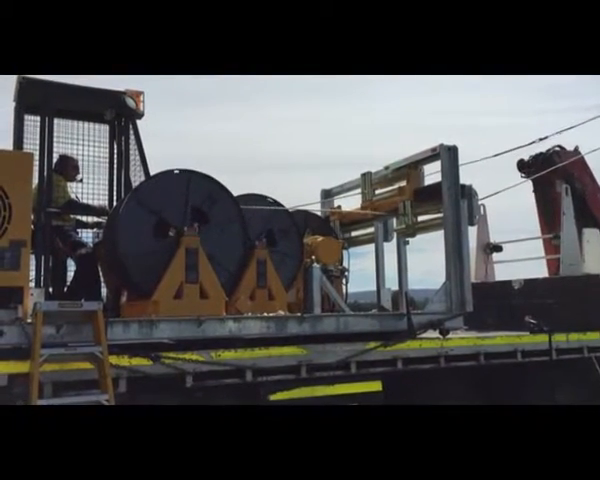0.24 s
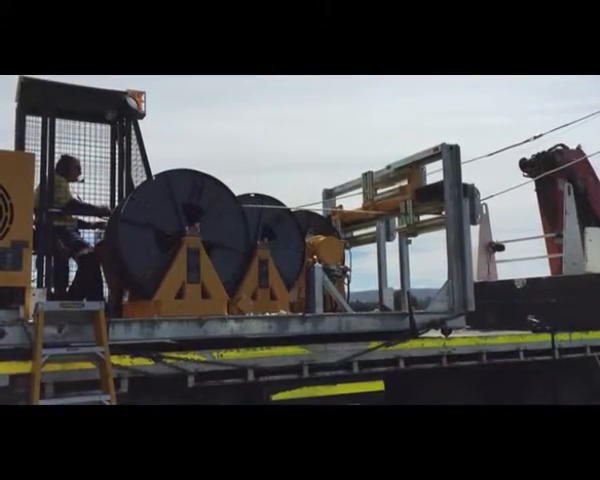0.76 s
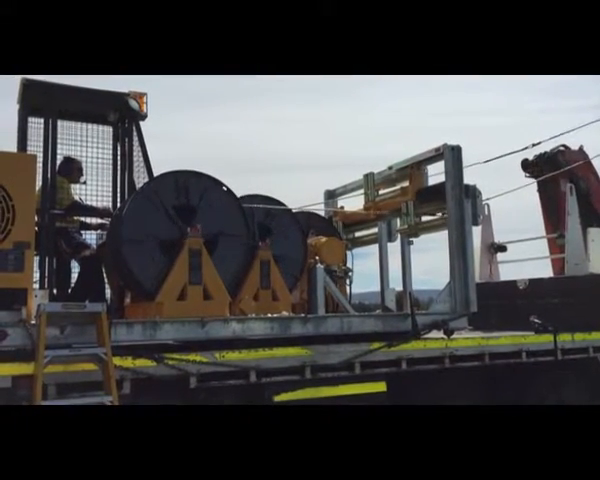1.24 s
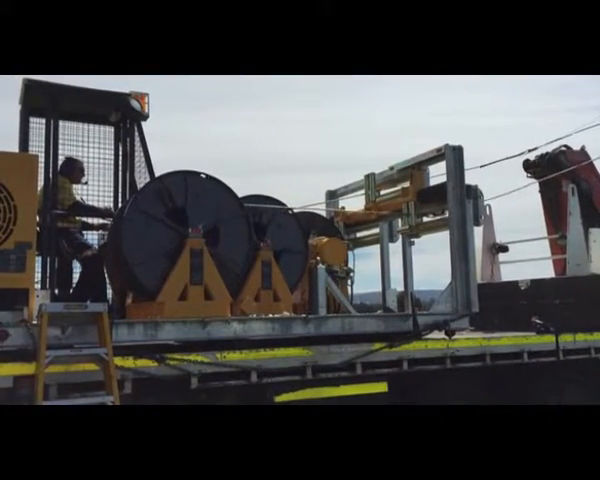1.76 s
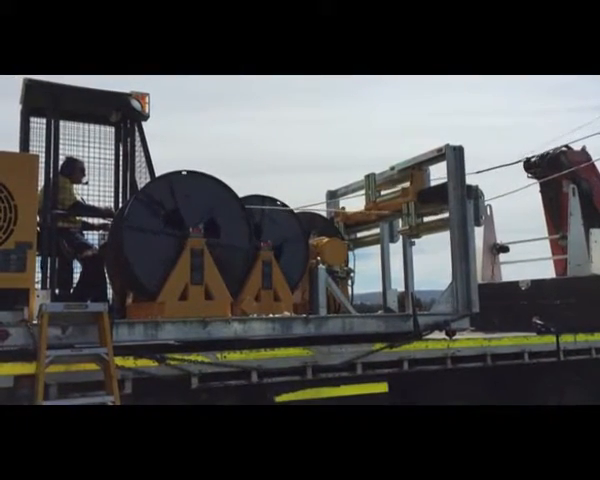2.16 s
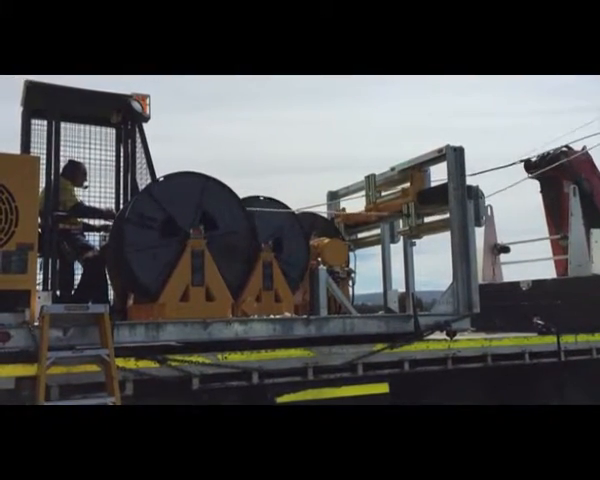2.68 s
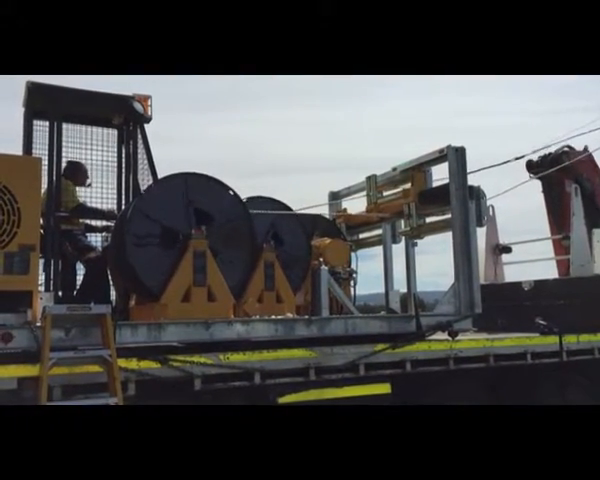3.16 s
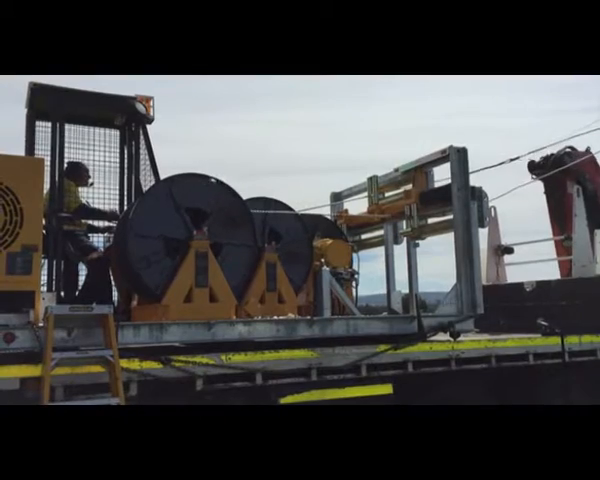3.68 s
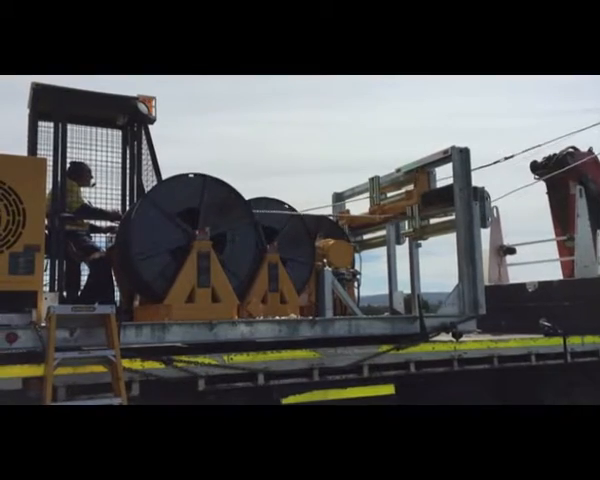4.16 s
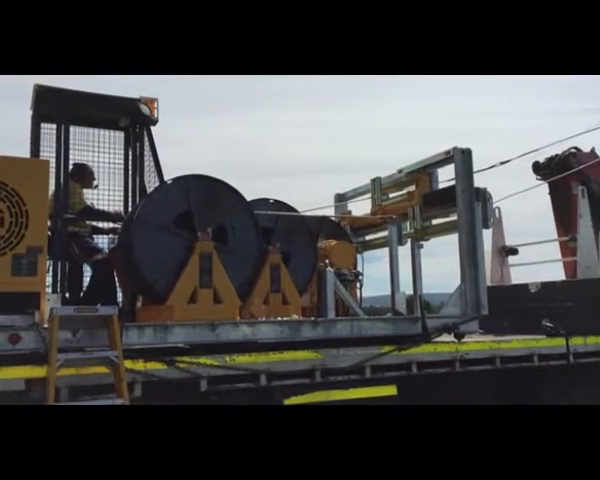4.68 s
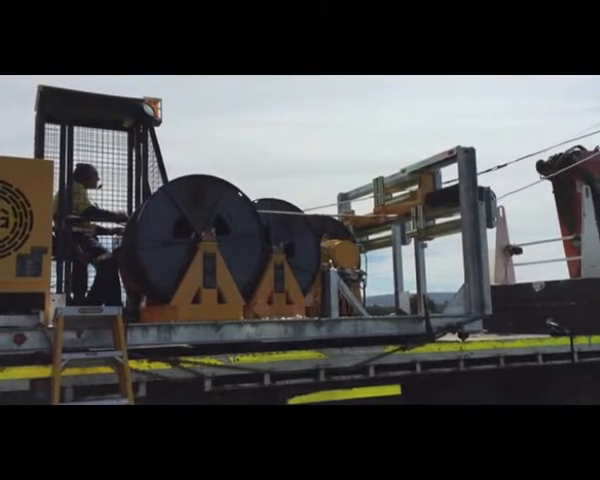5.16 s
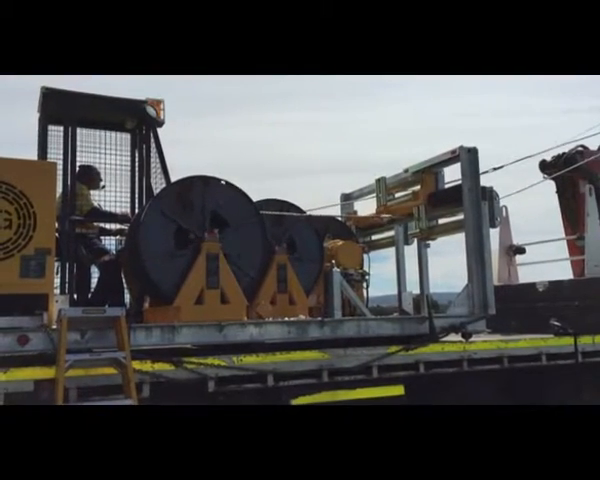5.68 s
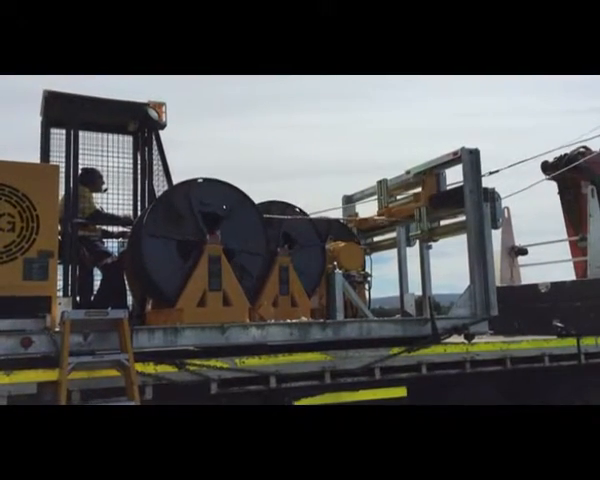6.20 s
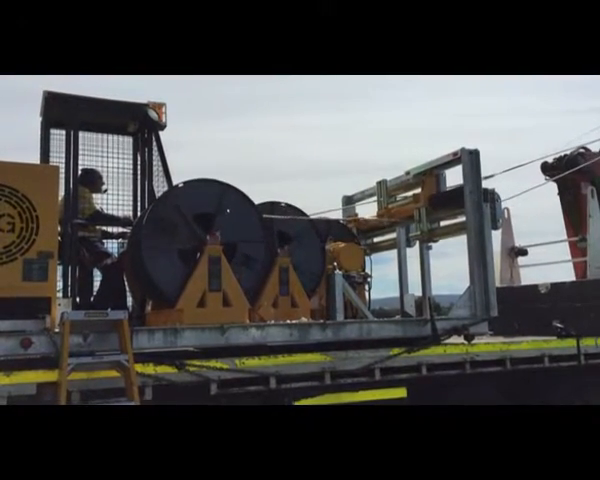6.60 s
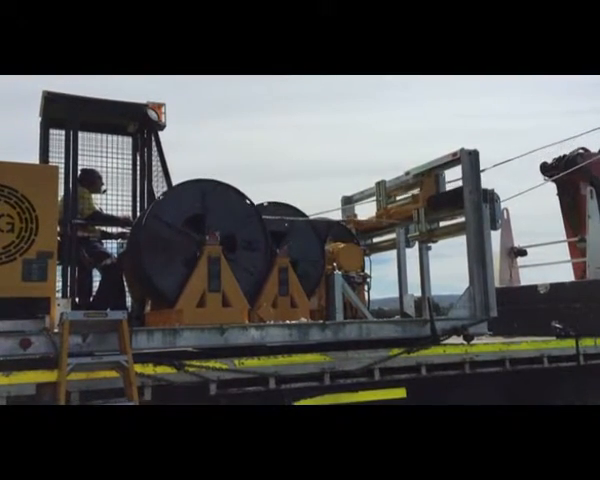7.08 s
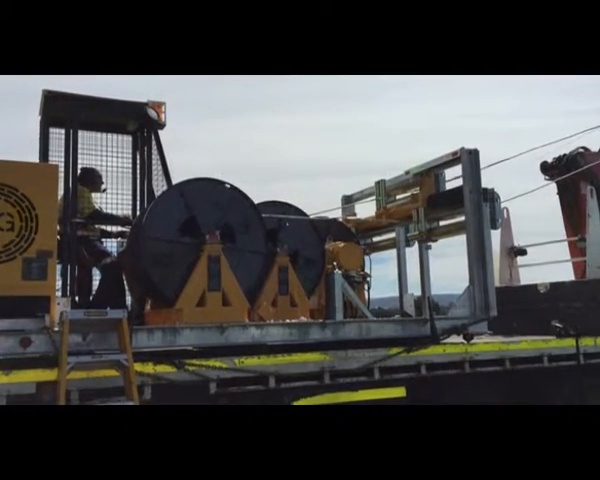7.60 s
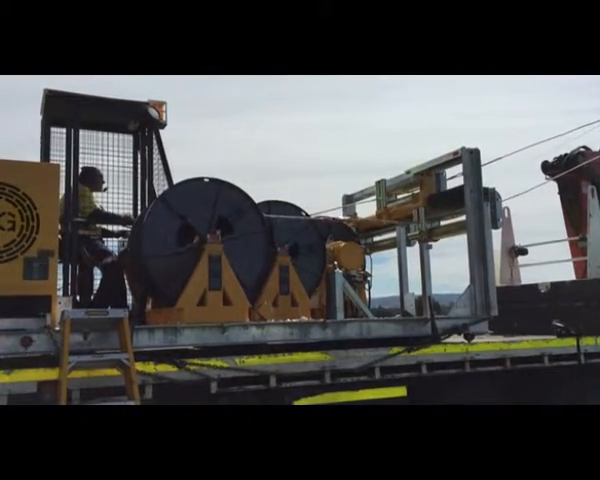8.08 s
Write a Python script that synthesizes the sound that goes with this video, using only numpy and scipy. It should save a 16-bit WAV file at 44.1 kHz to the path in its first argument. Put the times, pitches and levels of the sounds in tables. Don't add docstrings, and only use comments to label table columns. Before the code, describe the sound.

A diesel engine drones steadily at constant speed with a hydraulic pump whine and clattering knocks, while wind thumps the microphone at start and near the end.

```python
import sys
import numpy as np
from scipy import signal
from scipy.fft import rfft, irfft
from scipy.io import wavfile
from scipy.ndimage import uniform_filter1d

SR = 44100
rng = np.random.default_rng(int(sys.argv[2]) if len(sys.argv) > 2 else 0)


def volts_from_decibels(level):
    exponent = np.asarray(level, float) / 20
    return 10 ** exponent


def output_pcm(signal):
    pcm = np.clip(np.atleast_2d(signal).T, -1, 1) * 32767
    wavfile.write(sys.argv[1], SR, np.round(pcm).astype(np.int16))


N = 367794


def rms_one(x):
    return x / np.sqrt(np.mean(x ** 2) + 1e-20)


def in_time(rows):
    s, *columns = np.transpose(rows)
    return [np.interp(np.arange(N) / SR, s, c) for c in columns]


def at_hz(points, hz, axis=1):
    points = np.array(points)
    return np.interp(np.log(hz), np.log(points[:, 0]), points[:, axis])


def drift(rate):
    r = np.exp(-40 * np.pi * rate / SR)
    noise = rng.standard_normal(N // 20 + 4002)
    slow = signal.lfilter([1], [1, -2 * r, r * r], noise)[4000:]
    return np.interp(np.arange(N) / 20, np.arange(len(slow)), rms_one(slow))


def coloured(spectrum):
    hz = np.arange(1, N // 2 + 2) * SR / N
    white = rfft(rng.standard_normal(N))
    return rms_one(irfft(white * volts_from_decibels(at_hz(spectrum, hz)), N))


def resonate(x, hz, width):
    r = np.exp(-np.pi * width / SR)
    poles = [1, -2 * r * np.cos(2 * np.pi * hz / SR), r * r]
    return signal.lfilter([(1 - r * r) / 2, 0, (r * r - 1) / 2], poles, x)


# t/s, speed/rpm
CRANK_SPEED = [
    (0, 1771.2),
    (1.5, 1774.8),
    (3.3, 1773.4),
    (4.3, 1771.8),
    (5.4, 1774.3),
    (6.4, 1771.3),
    (8.34, 1773.9),
]


def crank_cycle():
    start_cycle = .029
    return start_cycle + np.cumsum(in_time(CRANK_SPEED)[0]) / 120 / SR


# order (multiple of the cycle; 4 = firing, 18 = pump pistons), rms level/dB
ORDERS = [(4, -31), (8, -49), (11, -57), (12, -51), (13, -51), (16, -49), (17, -47), (18, -36), (24, -54),
          (35, -52), (36, -37), (38, -52), (42, -53), (54, -51), (71, -45), (79, -46), (81, -47), (89, -49),
          (99, -41), (102, -43), (103, -42), (107, -47), (116, -49), (121, -46), (123, -44), (144, -51),
          (188, -52), (192, -55), (195, -58)]
# t/s, level over mean/dB
OIL_PRESSURE = [
    (0, .5),
    (1.3, 1),
    (2.8, -1),
    (4.2, 1.2),
    (5.3, -0.5),
    (6.5, 2),
    (7.6, 2.5),
    (8.34, 0.7),
]
ORDER_ANSWER = {4: (1, .05, 1, .01), 18: (.5, 1.01, .6, .01), 36: (2, 0.1, 0.3, -0.27)}


def exhaust_and_pump(cycle, waver, wander, spread):
    crest = .825
    pressure_db = in_time(OIL_PRESSURE)[0]
    swell = {}
    for order, (offset_db, share, swell_db, fade_db) in ORDER_ANSWER.items():
        fade = fade_db * np.arange(N) / SR
        swell[order] = volts_from_decibels(offset_db + share * pressure_db + swell_db * drift(1.6) + fade)
    turn = ((cycle - crest + wander * drift(3.9)) % 1).astype(np.float32)
    wavers = [drift(12.6) for k in range(5)]
    out = 0
    for k, (order, level_db) in enumerate(ORDERS):
        wavering = 1 + waver * (1 + order / 26.0) * wavers[k % 5]
        size = swell.get(order, 1) * volts_from_decibels(level_db) * wavering
        offset = np.float32(spread * rng.standard_normal() * (order > 12) / order)
        out = out + size * np.cos(np.float32(2 * np.pi * order) * (turn + offset))
    return np.sqrt(2) * out


FIRING_PLACES = [
    .055,
    .33,
    .565,
    .775,
]
# f/Hz, level/dB of cylinders 1, 2, 3, 4
CYLINDER_REACH = [(700, -2, 0, -2, -4), (1050, -2, 0, -4, -4), (1250, 0, -2, -2, 0), (1490, -2, -8, -5, 0),
                  (1800, -7, -1, -4, 0), (2100, -2, -1, -2, 0), (2770, 0, -4, 0, -5)]
# f/Hz, bandwidth/Hz, level/dB
BLOCK_MODES = [(638.5, 13.5, -10.5), (803, 30.4, -15.5), (959, 28, -12), (1055, 51.4, -9),
               (1196.3, 17, -3.5), (1292, 38, -6.5), (1494, 45.7, -.5), (1572, 28, -12.5), (1763, 40, -6),
               (1822, 64, -6), (2025, 18, -6.5), (2126, 48, -13), (2254, 43, -20.5), (2497, 27, -40),
               (2490, 45, -28), (2796, 65, -14), (2670, 55, -13.5)]


def block(cycle, rattle_db, jitter, scatter_db):
    knock_lead = .04
    whole = np.arange(-1, int(cycle[-1]))
    late = jitter * rng.standard_normal((len(whole), 4, 2))
    loud = scatter_db * rng.standard_normal((len(whole), 4, 2))
    firing = whole[:, None, None] + np.array(FIRING_PLACES)[:, None] - knock_lead
    knocks = firing + [0, .05]
    out = 0
    for k, (hz, width, level_db) in enumerate(BLOCK_MODES):
        path = rng.random((4, 2)) / hz
        reach_db = np.array([at_hz(CYLINDER_REACH, hz, axis=c) for c in range(1, 5)])
        reach_db = reach_db[:, None] + [0, -7.0]
        at = np.interp(knocks, cycle, np.arange(N), left=-99)
        at = (at + (late / hz + path) * SR).astype(int)
        size = volts_from_decibels(reach_db + loud + 1.5 * rng.standard_normal(at.shape))
        clicks = np.zeros(N)
        clicks[at[at >= 0]] = size[at >= 0]
        rattle = volts_from_decibels(rattle_db + 3 * (hz > 1900)) * rng.standard_normal(N)
        ringing = resonate(resonate(rms_one(clicks) + rattle, hz, 1.5 * width), hz, 2.5 * width)
        out = out + (-1) ** k * volts_from_decibels(level_db) * ringing
    return out


# f/Hz, density level/dB
RUSH_SPECTRUM = [(24, -13.5), (40, -8.5), (76, -10), (135, -12.5), (266, -10.5), (404, -20), (530, -7),
                 (867, -20.5), (1500, -8), (2400, -22.5), (2780, -5.5), (3100, -35), (4030, -74),
                 (6820, -120)]


def rush():
    return volts_from_decibels(-34.5 + 2.5 * drift(14.0)) * coloured(RUSH_SPECTRUM)


def engine_and_pump(cycle):
    sound = exhaust_and_pump(cycle, waver=.11, wander=.0006, spread=.12)
    sound += volts_from_decibels(-7.5) * block(cycle, rattle_db=-5.5, jitter=.11, scatter_db=2.3)
    sound += rush()
    edge_hz = 2940
    return signal.sosfilt(signal.ellip(8, 1, 50, edge_hz, fs=SR, output="sos"), sound)


def throb(cycle, sharp):
    return sum(np.exp(sharp * (np.cos(2 * np.pi * (cycle - at - .04)) - 1)) for at in FIRING_PLACES)


# f/Hz, bandwidth/Hz, level/dB
TREBLE_BANDS = [(3180, 40, -22), (3370, 40, -16), (3470, 40, -4.5), (3700, 40, -26), (3900, 30, -25),
                (3990, 33, -19), (4207, 33, -11.5), (4490, 30, -14.5), (4690, 40, -26), (4867, 40, -7),
                (5310, 40, -11), (5845, 110, -2.5), (6550, 40, -3), (7170, 50, -6), (7905, 47, -6),
                (8420, 100, -11.5), (8860, 80, -12), (9355, 70, -15), (9900, 85, -18)]
# f/Hz, density level/dB
FAN_SPECTRUM = [(2900, -70.5), (3100, -15.5), (4600, -27.5), (5080, -18), (5400, 1), (5800, 1),
                (6200, -4.5), (7600, -1.5), (8200, -12.5), (8600, -30.5), (8800, -15.5), (9500, -15),
                (9650, -30), (9850, -20)]


def fan(cycle, air_db, ring_db, throb_db, flicker_db):
    breaths = [volts_from_decibels(1.17 * drift(5.0)) for k in range(4)]
    rings = 0
    for k, (hz, width, level_db) in enumerate(TREBLE_BANDS):
        narrow = resonate(resonate(rng.standard_normal(N), hz, 1.2 * width), hz, 1.8 * width)
        rings = rings + volts_from_decibels(level_db) * breaths[k % 4] * narrow
    flicker = drift(8) + drift(35)
    shake = volts_from_decibels(throb_db * throb(cycle, sharp=16.0) + flicker_db * flicker)
    return shake * (volts_from_decibels(air_db) * coloured(FAN_SPECTRUM) + volts_from_decibels(ring_db) * rings)


# t/s, length/s, f/Hz, level/dB
PLATE_HUM = (5.18, .14, 640, -38)


def plate():
    s, length, hz, level_db = PLATE_HUM
    swell = np.exp(-(2 * (np.arange(N) / SR - s - length / 2) / length) ** 4)
    mode = resonate(resonate(rng.standard_normal(N), hz, 30.0), hz, 40.0)
    return volts_from_decibels(level_db) * swell * rms_one(mode)


# f/Hz, density level/dB
WIND_SPECTRUM = [(30, -13.5), (50, 1.5), (80, 10), (130, -0.5), (200, 3.5), (300, -21.5), (500, -64)]
# t/s at the height, rms level/dB, half length/s
WIND_GUSTS = [
    (0.0, -20.5, 0.028),
    (0.34, -35, 0.7),
    (1.3, -41, 0.51),
    (3.043, -41.5, .45),
    (4.897, -67, .4),
    (6.85, -40, .18),
    (7.158, -38, 0.13),
    (7.658, -37.5, 0.58),
    (8.34, -34.5, 0.16),
]
# t/s, peak level/dB, f/Hz, length/s
WIND_PUFFS = [(0.04, -9.5, 99, 0.026), (0.063, -19, 66, 0.036), (0.195, -13.5, 94.2, 0.024),
              (0.285, -42, 72.7, 0.044), (0.52, -23, 143, 0.028), (0.6, -17, 72.7, 0.0098),
              (0.785, -17, 167, 0.021), (0.836, -27, 72.7, 0.035), (1.031, -22, 88.8, 0.023),
              (1.075, -18, 72.7, 0.028), (3.648, -25, 72.7, 0.021), (6.965, -22, 72.7, 0.061),
              (7.046, -24, 116, 0.026), (7.117, -18, 78.1, 0.02), (7.312, -33, 72.7, 0.027),
              (7.598, -31, 72.7, 0.029), (7.78, -28, 72.7, 0.03), (7.959, -22, 108, 0.033),
              (8.095, -23, 72.7, 0.026)]


def wind(lumpy_db):
    t = np.arange(N) / SR
    calm_db = -60
    blowing = volts_from_decibels(calm_db)
    for s, level_db, half in WIND_GUSTS:
        blowing = blowing + volts_from_decibels(level_db) * np.exp(-((t - s) / half) ** 2)
    out = blowing * volts_from_decibels(lumpy_db * drift(47)) * coloured(WIND_SPECTRUM)
    for s, peak_db, hz, length in WIND_PUFFS:
        near = slice(max(int((s - .05) * SR), 0), int((s + .15) * SR))
        u = t[near] - s - length / 2
        bell = np.exp(-(2.6 * u / length) ** 2)
        out[near] += volts_from_decibels(peak_db) * bell * np.sin(2 * np.pi * hz * u)
    return out


def scene():
    cycle = crank_cycle()
    engine = engine_and_pump(cycle)
    air = fan(cycle, air_db=-39.0, ring_db=-20.0, throb_db=1.44, flicker_db=0.94)
    return (engine + air + plate() + wind(lumpy_db=2.5))[None]


# f/Hz, level/dB
LINE_THRESHOLD = [(1800, -90), (2400, -80), (3200, -72.5), (4600, -68), (5200, -95.5), (8500, -73),
                  (9600, -77), (9900, -70)]
# t/s, level/dB
THRESHOLD_RISE = [
    (0, 5.5),
    (2.2, 1.5),
    (3.4, -0.4),
    (6.6, -1.7),
    (7.0, 1),
    (8.34, -1.2),
]


def thin_out(x):
    cutoff_hz, strict_up_to_hz = 10030, 4100
    hz, s, lines = signal.stft(x, SR, nperseg=1024, noverlap=768)
    power = uniform_filter1d(abs(lines) ** 2, size=7, axis=-1)
    power = uniform_filter1d(power, size=2, axis=-2)
    floor = volts_from_decibels(at_hz(LINE_THRESHOLD, hz + 1)) * (hz > 1800) + (hz > cutoff_hz)
    frames = np.minimum(s * SR, N - 1).astype(int)
    strict_db = np.outer(hz < strict_up_to_hz, in_time(THRESHOLD_RISE)[0][frames])
    moving = volts_from_decibels(strict_db + drift(4)[frames])
    kept = power > (floor[:, None] * moving) ** 2
    return signal.istft(lines * kept, SR, nperseg=1024, noverlap=768)[1][:, :N]


def faint_band():
    hz = 12150
    band = rms_one(resonate(resonate(rng.standard_normal(N), hz, 120), hz, 160))
    return band * volts_from_decibels(-92 + 3 * drift(10))


def roll_off(x):
    return signal.sosfilt(signal.butter(12, 12700, fs=SR, output="sos"), x)


def record(dry):
    bass_cut_hz = 16
    heard = signal.sosfilt(signal.butter(2, bass_cut_hz, "high", fs=SR, output="sos"), dry)
    mix = thin_out(heard) + faint_band()
    return roll_off(mix)


dry = scene()
out = record(dry)
output_pcm(out)
```